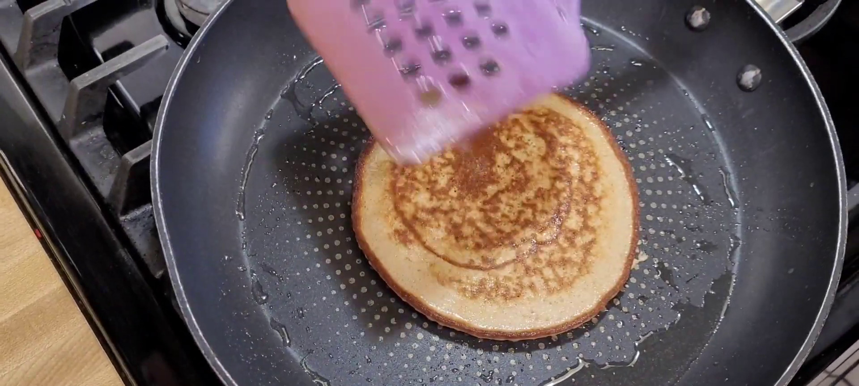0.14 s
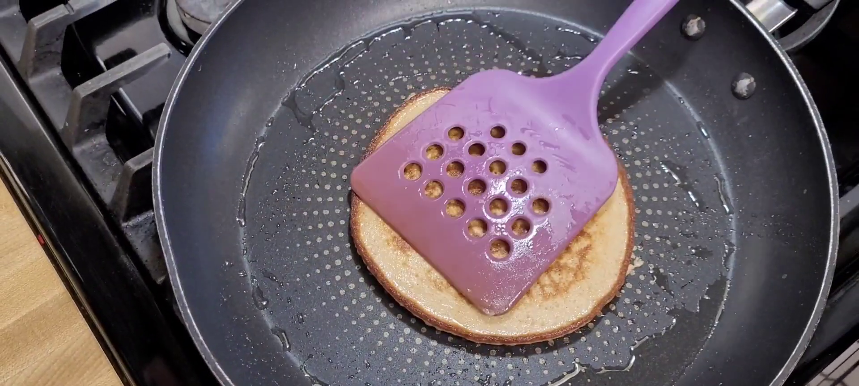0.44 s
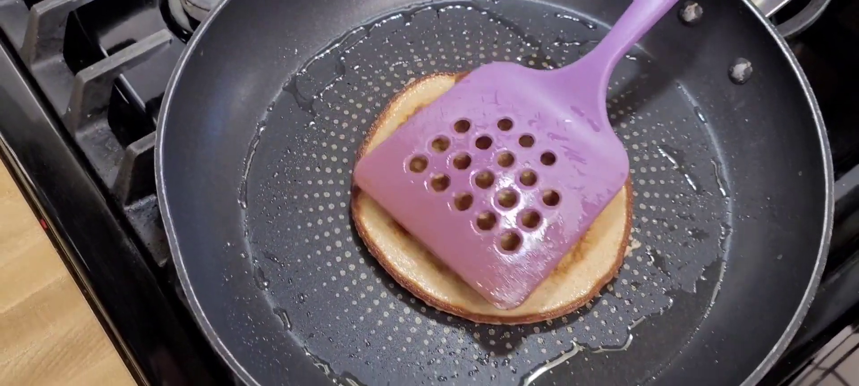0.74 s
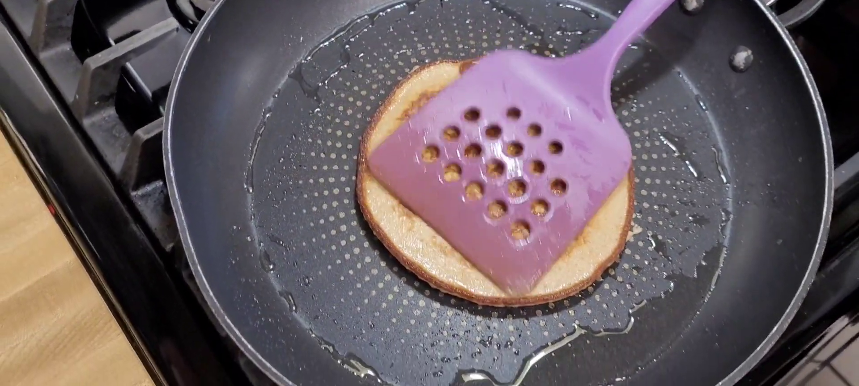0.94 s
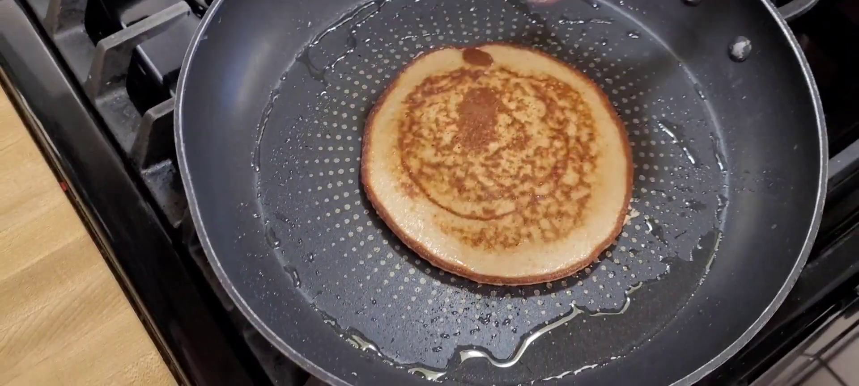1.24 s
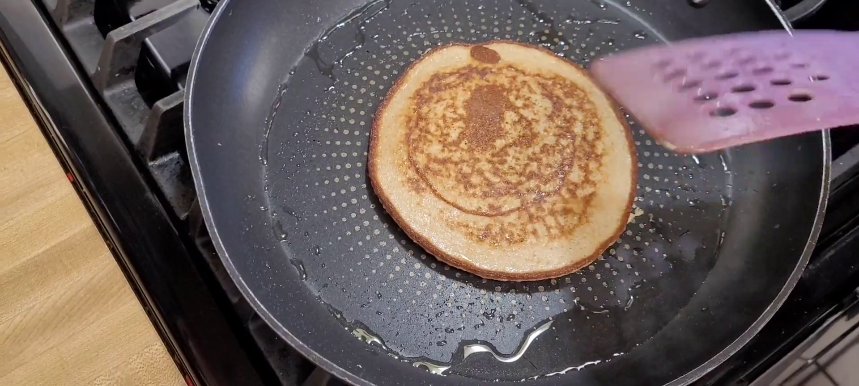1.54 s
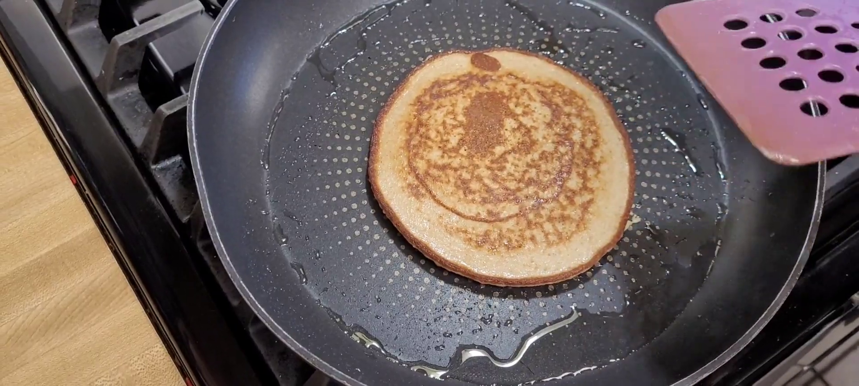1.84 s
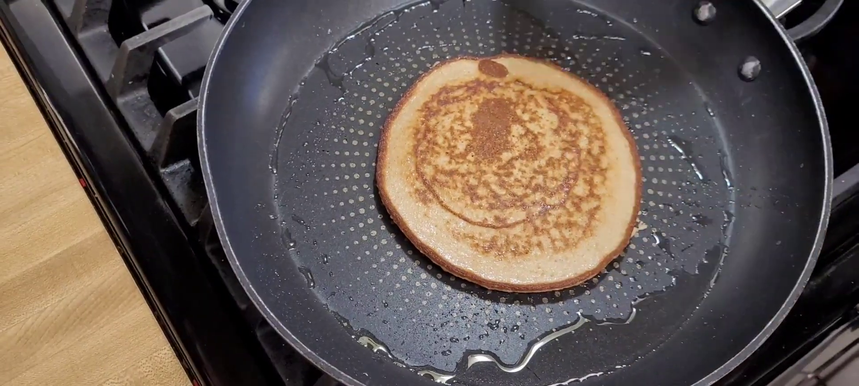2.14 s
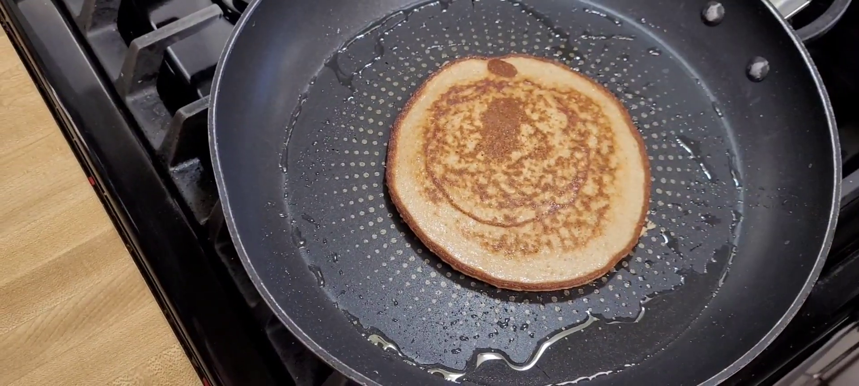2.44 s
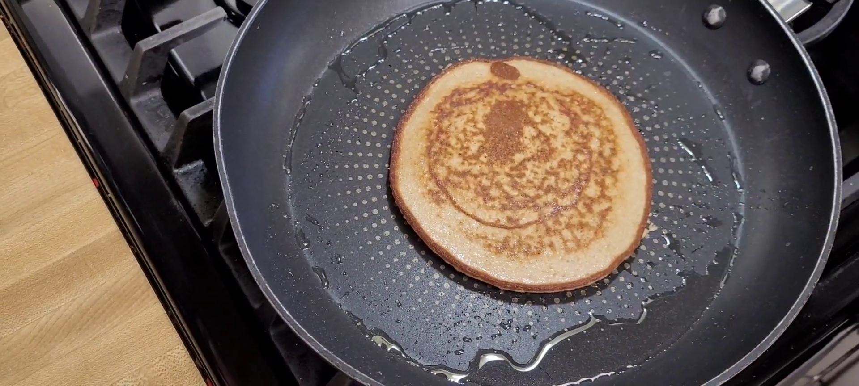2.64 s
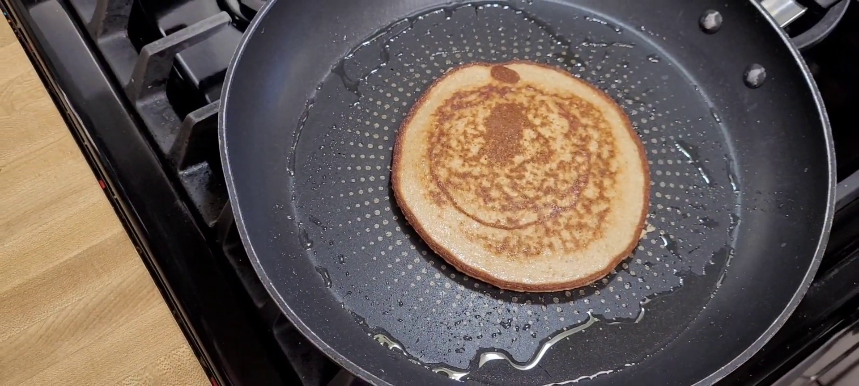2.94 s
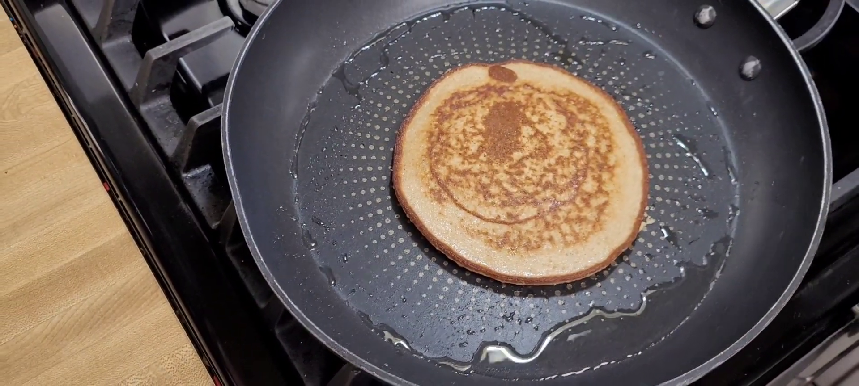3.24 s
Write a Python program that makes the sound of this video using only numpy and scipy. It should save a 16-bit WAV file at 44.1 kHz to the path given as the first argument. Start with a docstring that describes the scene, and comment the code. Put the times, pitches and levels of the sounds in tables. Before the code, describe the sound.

A pancake's bright oil sizzle dies to sparse spits, then spatula clinks and worktop knocks

```python
"""A freshly flipped pancake sizzles in an oiled pan: bursting bubbles plus hiss die down to single spits.
A gas burner (coloured noise) runs below; a plastic spatula pats the pancake (dead slaps, pressed steam),
then is laid down with a few clinks, probably on a dish (clatter, ringing modes).
A cluster of hollow knocks on the worktop follows (thump, ringing modes), in a small kitchen.
Soft bumps of handled things, and low thuds under slaps, clinks and knocks, are dull resonances with rustle."""
import sys
import numpy as np
from scipy import signal
from scipy.fft import rfft, irfft
from scipy.io import wavfile
from scipy.ndimage import uniform_filter1d

SR = 44100
rng = np.random.default_rng(int(sys.argv[2]) if len(sys.argv) > 2 else 0)


def to_wav(sig):
    """Store sig (one row per channel, or 1-D mono) as 16-bit WAV at the path in sys.argv[1].

    Samples outside -1..1 are clipped; the rate is SR.
    """
    pcm = np.clip(np.atleast_2d(sig), -1, 1) * 32767
    pcm = np.round(pcm).astype(np.int16)
    wavfile.write(sys.argv[1], SR, pcm.T)  # frames by channels


N = 149940

# colour of bursting bubbles: (frequency [Hz], relative level [dB])
BUBBLE_SPECTRUM = [(150, -23.5), (480, -21.5), (740, -11.5), (900, -15.5), (1080, -11), (1700, -11),
                   (2700, -13), (4000, -5.5), (7100, -4), (10000, -6), (15500, -6)]
# likeness of the two channels: (frequency [Hz], correlation [0-1])
CHANNEL_LIKENESS = [(250, 0.9), (600, 0.79), (1300, 0.13), (7000, 0.035)]
SIZZLE_PAN_DB = -1.5


def amp(db):
    """Decibels to gain."""
    return 10 ** (np.asarray(db) / 20)


def evened(x):
    """Scales to rms 1."""
    return x / np.sqrt(np.mean(x ** 2) + 1e-20)


def unit(x):
    """Scales each channel to unit energy."""
    return x / np.linalg.norm(x, axis=1, keepdims=True)


def read(points, hz):
    """Interpolates a table on a log-frequency axis."""
    f, value = np.transpose(points)
    return np.interp(np.log(hz + 1), np.log(f + 1), value)


def level(points):
    """Gain per sample from a (time [s], level [dB]) curve."""
    return amp(np.interp(np.arange(N) / SR, *np.transpose(points)))


def pan(db):
    """Left and right gains for a level difference; positive is left."""
    return amp([[db / 2], [-db / 2]])


def add(mix, start_s, sound):
    """Adds a stereo sound in place at a time, cut at the end of the mix."""
    start = max(round(start_s * SR), 0)
    part = mix[:, start:][:, :sound.shape[1]]
    part += sound[:, :part.shape[1]]


def colour(x, spectrum, size=4096):
    """Causal minimum-phase filter of unit energy with the given spectrum."""
    hz = abs(np.fft.fftfreq(size, 1 / SR))
    log_gain = np.log(amp(read(spectrum, hz)))
    response = np.exp(np.conj(signal.hilbert(log_gain)))
    taps = np.fft.ifft(response).real[:size // 2]
    taps = taps / np.linalg.norm(taps)
    return signal.oaconvolve(x, taps[None], axes=1)[:, :x.shape[1]]


def cut(x, hz, kind="low", order=2):
    """Butterworth low-pass or high-pass."""
    sos = signal.butter(order, min(hz, SR / 2 - 100), kind, fs=SR, output="sos")
    return signal.sosfilt(sos, x)


def resonate(x, hz, q):
    """A single resonance of peak gain 1."""
    return signal.lfilter(*signal.iirpeak(min(hz, SR / 2 - 100), q, fs=SR), x)


def spread(x):
    """Mixes two unrelated channels so that they are alike in the bass."""
    a, b = rfft(x)
    hz = np.fft.rfftfreq(x.shape[1], 1 / SR)
    same = np.clip(read(CHANNEL_LIKENESS, hz), -1, 1)
    mid = a * np.sqrt((1 + same) / 2)
    side = b * np.sqrt((1 - same) / 2)
    return irfft([mid + side, mid - side], x.shape[1])


def noise(size):
    """Stereo noise as it arrives in the room."""
    return spread(rng.standard_normal((2, size)))


def tail(t60s):
    """Half a second of dense ringing; each band dies at its own speed."""
    hz, t, z = signal.stft(noise(SR // 2), SR, nperseg=256)
    decay = amp(-60 * t / read(t60s, hz)[:, None])
    return signal.istft(z * decay, SR)[1][:, :SR // 2]


def kitchen(x, wet_db):
    """Adds the short reverberation of the kitchen: diffuse, dying sooner in the treble."""
    # (frequency [Hz], t60 [s])
    room_t60 = [(150, 0.52), (1500, 0.48), (6000, 0.16), (15000, 0.05)]
    echo = tail(room_t60)
    echo = echo / np.linalg.norm(echo[0])
    return x + amp(wet_db) * signal.fftconvolve(x, echo, axes=1)[:, :N]


def snap(decay_s):
    """A very short exponentially decaying noise burst of unit energy."""
    return unit(noise(512) * np.exp(-np.arange(512) / SR / decay_s))


def bubbles(rate_per_s):
    """Random bursts, mostly small; power stays even when the rate varies."""
    size_spread_db = 2.5
    size = amp(size_spread_db * np.minimum(rng.exponential(1, N), 4))
    burst = (2 * rng.random((2, N)) - 1) * size
    happens = rng.random(N) < rate_per_s / SR
    return evened(burst * happens / np.sqrt(rate_per_s))


def waver(count, size):
    """Slow random change of strength and phase makes each mode beat, per channel."""
    depth, speed_hz, step = 0.24, 40, 64
    drift = rng.standard_normal((2, count, size // step + 40, 2)) @ [1, 1j]
    # filtered at one value per step; the filter's onset is dropped
    drift = cut(drift, speed_hz * step)[..., 39:]
    drift = drift / np.sqrt(np.mean(abs(drift) ** 2))
    drift = uniform_filter1d(np.repeat(drift, step, axis=2), size=step)[..., :size]
    return (1 + depth * drift) / np.sqrt(1 + depth ** 2)


def blow(modes, spectrum, t60s, clatter_db, ring_db, crack_db, high_hz, place, pitch, free_s):
    """A hard contact: a crack, a dense clatter and beating modes, which ring freely until damped."""
    crack_s, ring_rise_s = 0.013, 0.0036
    rattle_db = 1  # rms unevenness of the clatter
    mute_db_per_s = 329  # damping once the struck thing is held still
    t = np.arange(SR // 2) / SR

    hz, edge_db, inner_db, t60 = np.transpose(modes)[:, :, None]
    strength = amp(edge_db + np.clip(place, 0, 1) * (inner_db - edge_db))
    fade = np.exp(-np.log(1000) * t / t60) * np.minimum(t / ring_rise_s, 1)
    turn = np.exp(2j * np.pi * (pitch * hz * t + rng.random(hz.shape)))
    # phase difference between channels sets their likeness
    apart = np.arccos(np.clip(read(CHANNEL_LIKENESS, hz), -1, 1)) * rng.choice([-.5, .5], hz.shape)
    side_turn = np.exp(1j * np.array([apart, -apart]))
    ring = (strength * fade * turn * side_turn * waver(len(hz), len(t))).real.sum(1) / 2

    unevenness = evened(uniform_filter1d(rng.standard_normal(len(t)), size=90))
    rattle = evened(amp(rattle_db * np.clip(unevenness, -2, 2)))
    crack = 1 + amp(crack_db) * np.exp(-t / crack_s)
    clatter = colour(tail(t60s) * rattle * crack, spectrum) / np.sqrt(2)

    held = amp(-mute_db_per_s * np.maximum(t - free_s, 0))
    return cut(amp(clatter_db) * clatter + amp(ring_db) * ring, high_hz) * held


def burner():
    """Gas flame: steady noise of fixed colour."""
    # (frequency [Hz], relative level [dB])
    flame_spectrum = [(25, -3), (60, 4.5), (100, 1), (170, -15), (300, -1), (520, -14), (730, -1),
                      (920, -24), (1400, 6), (1700, -3), (4300, -2), (9000, -18), (16000, -13.5)]
    return amp(-60.5) * colour(noise(N), flame_spectrum)


def bumps():
    """Soft bumps of handled things, and low thuds under slaps, clinks and knocks: dull resonances, rustle."""
    # (time [s], level [dB], centre [Hz], ring t60 [s], rustle re body [dB])
    thuds = [(.005, -50, 108, .35, 3.5), (.826, -57, 440, 0.25, 5.5), (1.21, -62, 128, 0.8, 5),
             (1.490, -55, 64, 0.5, 4), (2.272, -49.5, 241, 0.28, -23), (2.298, -41, 227, 0.24, -15),
             (2.525, -45.5, 172, 0.41, -14), (2.638, -39, 137, 0.4, -6), (3.171, -27, 127, 0.11, -14),
             (3.249, -36.5, 124, 0.47, 9), (3.38, -39.5, 204, .7, 1)]
    rise_s, rustle_hz = 0.0008, 664
    q = 1 / 0.43
    out, t = np.zeros((2, N)), np.arange(SR // 2) / SR
    for start_s, db, hz, t60, rustle_db in thuds:
        body = evened(resonate(resonate(noise(len(t)), hz, q), hz, q))
        rustle = evened(cut(cut(noise(len(t)), rustle_hz), hz / 2, "high"))
        shape = np.minimum(t / rise_s, 1) * np.exp(-np.log(1000) * t / t60)
        bump = unit((body + amp(rustle_db) * rustle) * shape)
        add(out, start_s, amp(db) * bump * np.linalg.norm(shape))
    return out


def worktop():
    """Hollow knocks excite the worktop's modes; the first and the late ones sound lower."""
    # (frequency [Hz], struck at edge [dB], struck further in [dB], t60 [s])
    worktop_modes = [(83, -10, -8, .35), (156, -9, -2, .3), (232, 0, -11, .3), (263, -6, 1, .42),
                     (372, 2, -5, .19), (405, -13, -6, .4), (593, -2, -6, .29), (742, -7, 1, .28),
                     (1448, -8, -2, .11), (1526, -3, -11, .2), (2120, -7, 0, .15)]
    # (time [s], clatter [dB], ring [dB], crack [dB], high edge [Hz],
    #  place [0 edge - 1 further in], pitch factor [1], free ringing [s])
    knocks = [(3.0226, -25, -33, -2.5, 4300, 0.44, 0.8, 0.088), (3.0495, -26, -23.5, 1, 9500, 0, 1, .06),
              (3.109, -35, -30, 3, 1900, .4, 1, .03), (3.1272, -23, -22.5, 3, 6000, 1, 1, .08),
              (3.2421, -36, -30.5, 0, 2940, 0.38, .9, 0.06), (3.268, -42.5, -32.5, 0, 6660, 0, .93, 0.05)]
    # (frequency [Hz], relative level [dB])
    thump_spectrum = [(30, -29), (90, -9), (650, -5.5), (1100, -8.5), (2200, -3.5), (2800, -13.5),
                      (5000, -16.5), (9500, -33.5), (16000, -28)]
    # (frequency [Hz], t60 [s])
    thump_t60 = [(100, 1), (600, 1), (2000, 0.26), (5000, 0.26), (12000, 0.2)]
    out = np.zeros((2, N))
    for start_s, *contact in knocks:
        add(out, start_s, blow(worktop_modes, thump_spectrum, thump_t60, *contact))
    return out * pan(-1.5)


def dish():
    """The spatula clatters and rings the dish's modes as it is laid down and settles."""
    # (frequency [Hz], struck at edge [dB], struck further in [dB], t60 [s])
    dish_modes = [(548, -8.5, -2.5, 0.19), (1410, -16, -5, 0.16), (1926, 8.5, 1, 0.29),
                  (2750, 6, -11.5, .22), (3190, -20, 6.5, .08), (3550, -15, 7.5, 0.057),
                  (4140, 12, 0.5, .085), (4870, 12, -3, 0.073), (5210, -17, 11.5, 0.069),
                  (6810, 10.5, -14, 0.13), (7040, -5, -5.5, 0.081)]
    # (time [s], clatter [dB], ring [dB], crack [dB], high edge [Hz],
    #  place [0 edge - 1 further in], free ringing [s])
    clinks = [(2.4911, -37, -53, -3, 9300, 0.17, 0.03), (2.500, -31, -36.5, 2, 15500, 0.069, 0.13),
              (2.640, -35.5, -60, -9, 2900, 0.9, 0.026), (2.6639, -27.5, -22.5, -11, 7700, 0.92, .1),
              (2.704, -42, -34, -6, 9000, 0.64, 0.055), (2.7443, -38.5, -34.5, 2, 7300, 0.88, 0.069)]
    # spatula: (frequency [Hz], relative level [dB])
    clatter_spectrum = [(100, -4.5), (550, 1), (920, -9), (1500, -0.5), (3500, 4), (5200, 0.5),
                        (7300, -1.5), (16000, -2)]
    # (frequency [Hz], t60 [s])
    clatter_t60 = [(300, 0.86), (2000, 0.3), (6000, 0.27), (14000, 0.12)]
    out = np.zeros((2, N))
    for start_s, *contact, free_s in clinks:
        pitch = 1
        add(out, start_s, blow(dish_modes, clatter_spectrum, clatter_t60, *contact, pitch, free_s))
    return out * pan(-1.5)


def spatula():
    """Dead slaps on the soft pancake, and the steam that the pressure drives out."""
    # slaps and thumps: (time [s], level [dB], low edge [Hz], high edge [Hz], left-right [dB])
    pats = [(0.5867, -12.5, 225, 3000, -16.5), (.587, -17.5, 247, 500, -20),
            (.6508, -10, 1490, 3530, -12.5), (0.8216, -24, 497, 980, -6), (1.053, -37.5, 150, 570, 8),
            (1.115, -40, 170, 900, 14)]
    # steam pressed from under the pancake: (time [s], level [dB])
    steam_level = [(.58, -75), (.593, -46), (.615, -54), (.645, -40), (.695, -48.5), (.715, -71), (.9, -79)]
    # (frequency [Hz], relative level [dB])
    steam_spectrum = [(60, -5), (700, -3), (1500, 1), (2600, 1), (4500, -17), (8000, -37)]
    grit_decay_s, grit_db, wet_db = 0.00094, 3.5, -10.5
    steam_bubbles_per_s = 900
    slaps = np.zeros((2, N))
    for start_s, db, low_hz, high_hz, pan_db in pats:
        # plain blow plus wet grit
        slap = signal.unit_impulse(512) + amp(grit_db) * snap(grit_decay_s)
        slap = cut(cut(slap, high_hz, order=4), low_hz, "high")
        add(slaps, start_s, amp(db) * pan(pan_db) * unit(slap))
    steam = colour(spread(bubbles(steam_bubbles_per_s)), steam_spectrum) * level(steam_level)
    return kitchen(slaps, wet_db) + steam * pan(SIZZLE_PAN_DB)


def spits():
    """Larger oil droplets burst singly, each a short resonance of its own pitch."""
    # (time [s], level [dB], pitch [Hz])
    droplets = [(.134, -5.5, 14500), (0.5875, -15, 5540), (0.92, -18, 4800), (1.364, -27, 11000),
                (1.402, -22, 6600), (1.4421, -20, 6000), (1.684, -25, 11100), (1.978, -23.5, 14000)]
    decay_s, q, splash_db, wet_db = 0.00019, 1.13, -22, -3
    out = np.zeros((2, N))
    for start_s, db, hz in droplets:
        pop = unit(resonate(snap(decay_s), hz, q))
        splash = amp(splash_db) * snap(decay_s)
        add(out, start_s, amp(db) * (pop + splash))
    return colour(kitchen(out, wet_db), BUBBLE_SPECTRUM) * pan(SIZZLE_PAN_DB)


def sizzle():
    """Steam bubbles burst in the oil, thinning out until about 2.45 s, then faintly rising again."""
    # (time [s], level [dB])
    sizzle_level = [(0, -33), (.15, -36.5), (.42, -40), (.72, -42), (.97, -45), (1.1, -47.5), (1.45, -52.5),
                    (1.65, -57), (2.0, -58.5), (2.45, -64), (3.4, -60.5)]
    peak_bubbles_per_s, thinning_exponent = 4000, 0.86
    hiss_share = 0.48  # of power
    flutter_rms_db, wet_db = 1, -8.5
    heat = level(sizzle_level)
    rate_per_s = peak_bubbles_per_s * (heat / heat.max()) ** thinning_exponent
    fizz = np.sqrt(1 - hiss_share) * bubbles(rate_per_s) + np.sqrt(hiss_share) * noise(N)
    flutter = evened(uniform_filter1d(rng.standard_normal(N), size=600))
    fizz = evened(kitchen(fizz * amp(flutter_rms_db * flutter), wet_db))
    return colour(fizz * heat, BUBBLE_SPECTRUM) * pan(SIZZLE_PAN_DB)


def scene():
    """Burner, the things handled beside it, and the pan."""
    return burner() + bumps() + worktop() + dish() + spatula() + spits() + sizzle()


def record(dry):
    """The ripple of the microphone ports, then the band limit."""
    # (frequency [Hz], relative level [dB])
    port_ripple = [(5600, 0), (7100, 3), (8300, 1), (9900, -5), (11700, 4), (13700, -4), (15400, 4)]
    edge_hz = 15900
    band_limit = signal.firwin(1023, edge_hz, window=("kaiser", 9), fs=SR)
    return signal.oaconvolve(colour(dry, port_ripple), band_limit[None], "same")


dry = scene()
out = record(dry)
to_wav(out)
```